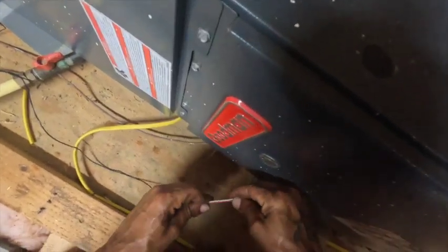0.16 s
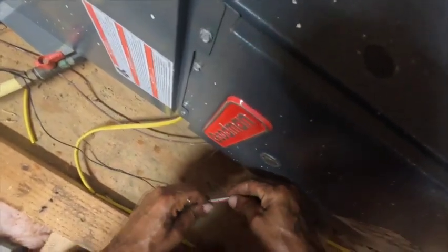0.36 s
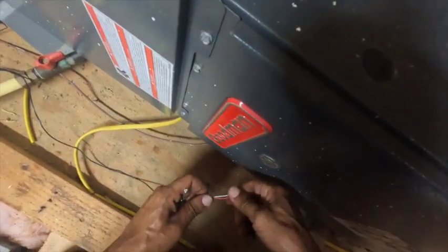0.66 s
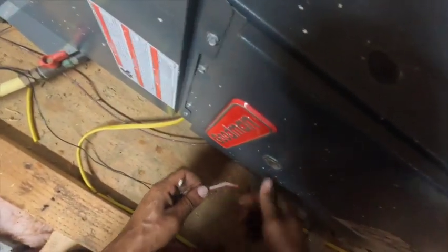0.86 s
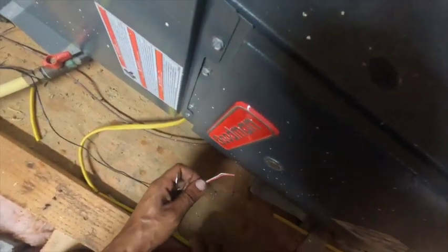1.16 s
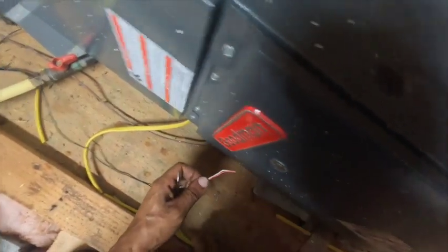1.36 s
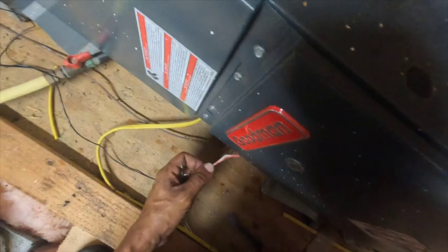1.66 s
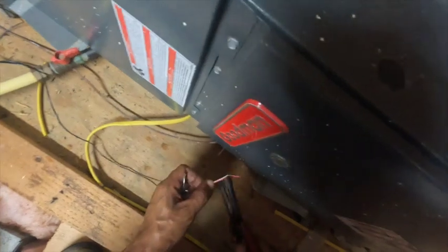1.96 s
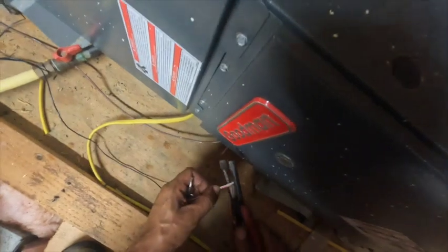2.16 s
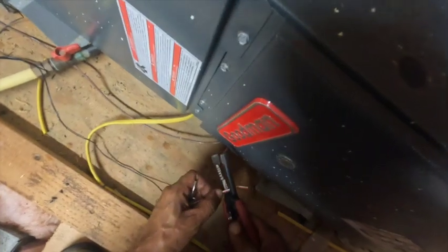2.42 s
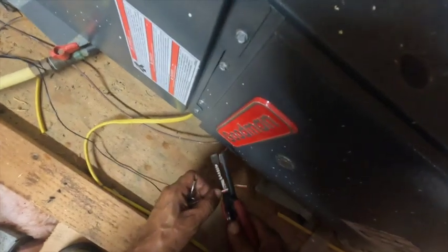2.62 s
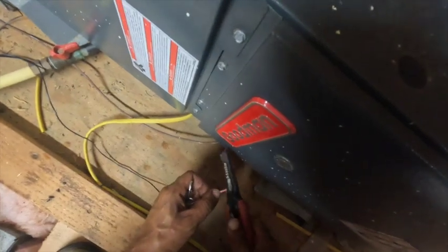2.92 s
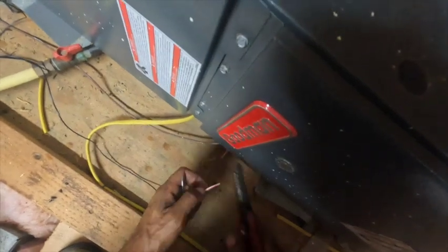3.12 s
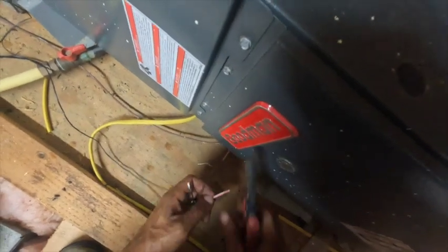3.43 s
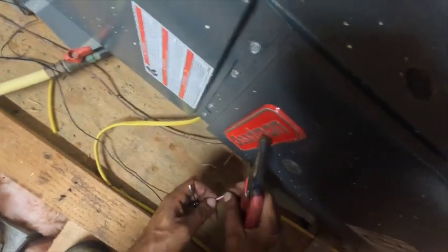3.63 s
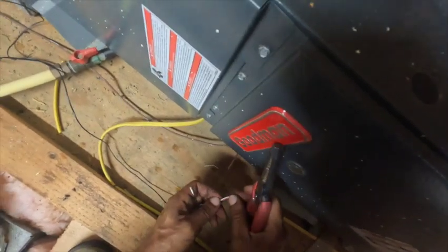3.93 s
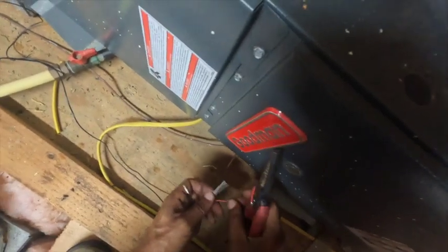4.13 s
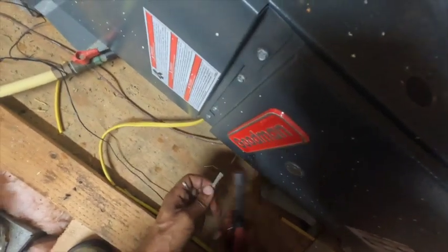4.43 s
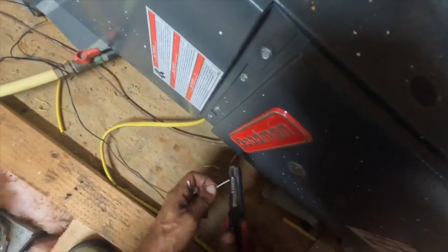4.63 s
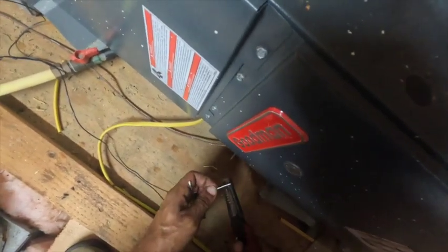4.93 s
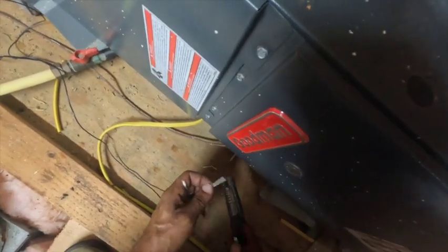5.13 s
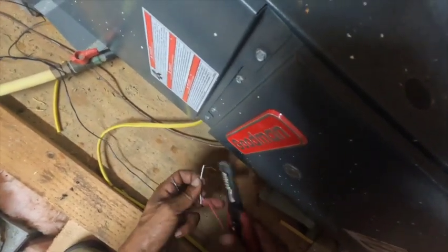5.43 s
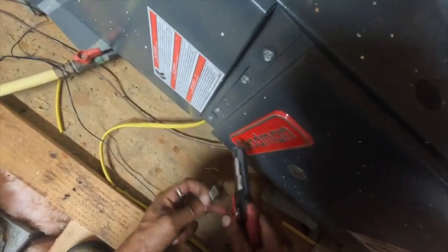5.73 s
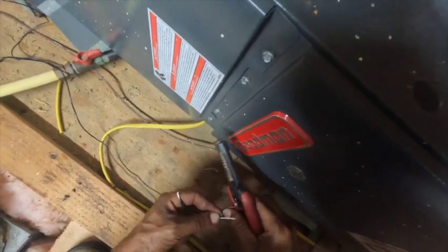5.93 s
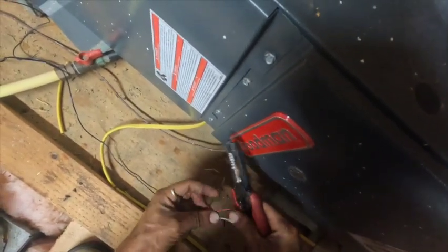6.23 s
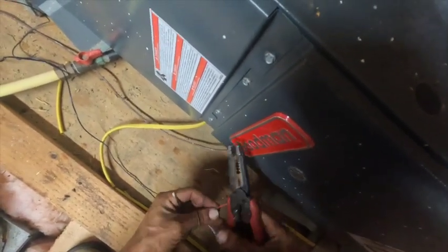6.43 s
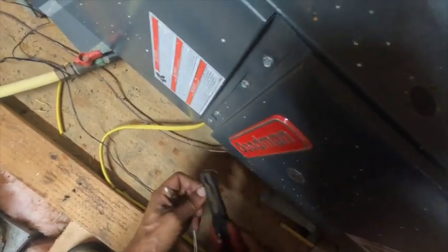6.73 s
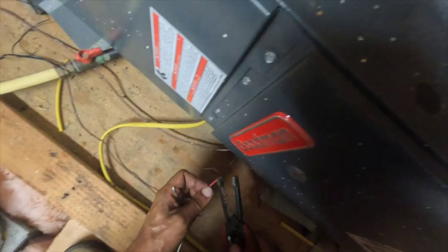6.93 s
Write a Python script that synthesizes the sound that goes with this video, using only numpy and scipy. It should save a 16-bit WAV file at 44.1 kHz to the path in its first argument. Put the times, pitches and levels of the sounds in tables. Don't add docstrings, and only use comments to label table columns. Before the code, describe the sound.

Throughout about 7 seconds, a deep blower rumble swells and sags beneath soft moving air, hollow duct hiss, a very faint mains hum and a thin treble hiss chattering about thirty times a second. Floor boards rustle and thud dully as weight shifts, notably around 1.2, 1.6, 2.95 and near the end. At 1.57 s, wire strippers give a quick cluster of small metallic clicks and a faint scrape. At 2.95 s comes a hard, dry, bright snip with a short jaw ring and fine shimmer, clearly the loudest sound. Lighter clicks and scrapes follow at 3.1-3.3 s. At 3.64 s the tool knocks sheet metal: a low hollow ring, brief rattle and fainter settling touches. Two tiny high squeaks occur around 4.5-4.6 s, a faint tick at 4.8 s, then mostly background. Close body-worn microphone, short wooden-room reflections.

```python
import sys
import numpy as np
from scipy import signal
from scipy.fft import rfft, irfft, next_fast_len
from scipy.io import wavfile
from scipy.ndimage import uniform_filter1d

SR = 44100
rng = np.random.default_rng(int(sys.argv[2]) if len(sys.argv) > 2 else 0)


def magnitude_from_level(level_db):
    exponent = np.asarray(level_db, float) / 20
    return 10 ** exponent


def transcribe(signal):
    frames = np.atleast_2d(signal).T
    limited = np.clip(frames, -1, 1)
    pcm = np.round(limited * 32767).astype(np.int16)
    wavfile.write(sys.argv[1], SR, pcm)


N = 311787
SIZE = next_fast_len(N + 16384)
HZ = np.maximum(np.arange(SIZE // 2 + 1) * SR / SIZE, .1)

# t/s, peak level/dB, main ring f/Hz, dull modes re peak/dB, upper ring re peak/dB
JAW_CLICKS = [(1.5648, -37, 5340, -30, -6), (1.5707, -46, 2840, -15, -17), (1.576, -43, 4700, -7, -8),
              (1.5804, -45, 4870, -24, -8), (2.925, -38, 5030, -28, -19), (2.942, -38, 4660, -33, -24),
              (2.945, -36, 4700, -30, -22), (2.947, -9.5, 4750, -33.5, -17.5),
              (2.9508, -24.5, 4470, -36, -21), (3.126, -31, 5060, -15, -20), (3.203, -41, 3770, -17, -7),
              (3.2066, -44, 4380, -17, -9), (3.2098, -42, 2920, -20, -23), (3.3096, -54, 4970, -5, -18),
              (3.3247, -59, 5470, -12, -14), (4.773, -56, 2950, -6, -17)]
# f/Hz, width/Hz, level/dB
JAW_MODES = [(593, 120, -37), (940, 67, -42), (1277, 120, -28.5), (1705, 55, -24), (2050, 120, -20),
             (2850, 280, -15.5), (3340, 310, -20.5), (3700, 87, -24), (4040, 81, -20), (4750, 240, 3),
             (5540, 260, -16), (5880, 250, -17), (6740, 290, -0.5), (8700, 850, -11.5), (10230, 1500, -15),
             (10900, 1500, -30), (11900, 1800, -26), (13700, 2000, -31)]
# f/Hz, level/dB per Hz
CRACK_SPECTRUM = [(900, -49), (1400, -26), (3000, -5.5), (4800, -1.5), (6800, -1.5), (7900, -18),
                  (10000, -9.5), (12500, -17.5), (15600, -29)]
# t/s, length/ms, fade/ms, level/dB
WIRE_BITES = [(1.568, 15, 16, -55.5), (2.942, 3.9, 2.4, -38), (1.6, 45, 20, -72), (2.948, 5.1, 30.3, -38.5),
              (3.103, 14, 3., -66), (3.117, 4, 3., -60), (3.121, 5.6, 3., -52), (3.128, 8., 27, -52.5),
              (3.204, 7.3, 20, -59), (3.3, 32, 8., -67)]
# f/Hz, level/dB per Hz
RUB_SPECTRUM = [(900, -34), (1300, -17), (1700, -14), (2310, -11), (2900, -12.5), (3480, -7.5),
                (4200, -3.5), (4900, 0), (5600, -8), (6700, -9), (7900, -18.5), (9700, -28), (11500, -36),
                (15500, -46)]
# t/s, length/s, pitch f/Hz, rms level/dB, octave re fundamental/dB
PIVOT_SQUEAKS = [
    (4.506, 0.054, 4960, -70.5, -14),
    (4.58, .05, 5020, -72, -14),
]
# t/s, level/dB, fade/s
BLADE_SHIVERS = [
    (2.952, -61, .04),
    (3.125, -70, .008),
    (3.642, -68, .01),
]
# f/Hz, level/dB per Hz
SHEEN_SPECTRUM = [(7500, -30), (8500, -15), (10000, -4), (12000, -7), (14000, -9), (15600, -28)]

# peak level/dB, rattle length/ms, rattle level/dB, left minus right/dB
KNOCK_LEVELS = (-34, 8.5, -42, 1.5)
# f/Hz, level/dB, t60/s
PANEL_MODES = [(71.3, -5.5, 0.28), (108.6, -13, .25), (152.2, -3, 0.29), (183, -7, .35), (201.2, 1.5, 0.37),
               (228, -13, 0.46), (280, -9, 0.39), (340, -10.5, 0.34), (430, -19, 0.26), (620, -34, 0.22),
               (850, -29, .15), (1040, -11.5, 0.2), (1122, -17, 0.27), (1244, -7.5, 0.43),
               (1500, -22, 0.27), (1754, -18, 0.2), (2330, -22, .15), (2729, -25, .12), (3230, -23, .12)]
# f/Hz, level/dB per Hz
RATTLE_SPECTRUM = [(290, -38), (500, -11), (1090, -2), (1800, -11), (2290, -15), (2860, 1), (3470, -7.5),
                   (5660, -1.5), (6150, -7), (6780, -1), (8240, -23.5), (12200, -32), (14000, -51)]
# f/Hz, level/dB per Hz
SETTLE_SPECTRUM = [(400, -17), (800, -11), (1150, -2.5), (1450, -6.5), (1750, -0.5), (2300, -12),
                   (2850, -8), (3600, -15), (4650, -8), (7000, -28), (8500, -32)]
# t after knock/s, level/dB, fade/s
RETOUCHES = [
    (.042, -10, 0.01),
    (.1, -18, .02),
    (.125, -15, .015),
]

# delay/ms, level/dB
FACE_ECHOES = [
    (3.6, -11.5),
    (10.0, -18.5),
    (16.5, -23.5),
]
# f/Hz, left lead/rad, left minus right/dB
NEAR_PORTS = [(500, 0, -3), (1500, -.7, 1), (2150, -2.2, -.5), (2800, -2.2, -1), (3400, -.7, -1.5),
              (4300, -.2, -2), (9000, -.3, -.5), (13000, -1.2, -4)]
# f/Hz, share
WASH_SPREAD = [(500, 1.1), (2200, 4.6), (3500, 4.5), (4500, 0.43), (9000, 0.2), (13000, 0.45)]
# f/Hz, left minus right/dB, likeness 0-1, left lead/rad
DIFFUSE_PORTS = [(20, -4.5, .995, 0), (100, -3, .9, 0), (200, -4.5, .7, .2), (400, -6, .3, 0),
                 (800, -5.5, .15, -.4), (1250, 0, .55, -.5), (1750, 2.5, .8, -.6), (2200, 2.5, .5, -1.),
                 (2800, 3, .75, -1.1), (3900, 0, .55, -.8), (4500, -.8, .95, 0), (7200, -.5, .96, 0),
                 (8500, -.3, .78, .1), (14000, .5, .7, .1)]

# f/Hz, level/dB per Hz
RUMBLE_SPECTRUM = [(1, -24.5), (5, -2.5), (13, -1), (18, -3), (28, -11.5), (35, -15.5), (45, -26.5),
                   (50, -34), (60, -45), (80, -72)]
# t/s, sub-bass level/dB
BLOWER_LOAD = [(0.0, -33), (0.025, -20), (0.1, -24), (0.7, -26.5), (1.3, -28.5), (1.9, -25), (2.9, -31.5),
               (2.96, -21), (3.3, -30.5), (3.9, -34.5), (3.97, -23.5), (4.12, -30), (4.3, -32),
               (4.8, -27.5), (5.2, -26.5), (5.7, -30.5), (6.2, -29), (7.07, -30.5)]
# f/Hz, level/dB per Hz
AIR_SPECTRUM = [(40, -40), (62, -13), (105, -6.5), (175, 0), (250, -8), (330, -9), (460, -15.5),
                (800, -23.5), (1100, -48)]
# f/Hz, level/dB per Hz
DUCT_SPECTRUM = [(410, -18.5), (700, -15), (823, -16.5), (945, -8), (1020, -5.5), (1130, -5.5), (1310, -2),
                 (1430, -6.5), (1730, 1), (2320, -9), (2750, -5), (3140, -10.5), (4110, -12), (4400, -8),
                 (5720, -58), (9680, -120)]
# f/Hz, level/dB per Hz
BOARD_SPECTRUM = [(40, -45), (62, 1), (75, 2.5), (105, -1), (175, -2.5), (230, -7), (330, -22), (500, -26),
                  (900, -29)]
# t/s, peak level/dB
WEIGHT_SHIFTS = [(0.09, -42), (0.249, -51), (0.44, -47), (2.41, -48), (5.12, -49), (4.39, -55), (6.6, -52),
                 (6.7, -46), (1.049, -47), (1.22, -39.5), (1.413, -45), (1.563, -40), (1.886, -50),
                 (2.089, -66), (2.6, -51), (2.95, -37.5), (3.974, -44.5), (3.84, -50), (4.85, -49),
                 (5.389, -55), (6.42, -59), (4.58, -45), (5.229, -57), (6.199, -70), (6.814, -41),
                 (7.039, -37)]
# f/Hz, level/dB per Hz
CIRCUIT_SPECTRUM = [(3300, -13), (4000, -12.5), (4960, 2.5), (5590, -1), (5960, 1.5), (6320, -5),
                    (6640, -3), (6860, -4.5), (7200, -9), (8190, -14.5), (9520, -14.5), (11000, -15.5),
                    (11500, -23.5), (13400, -26), (14100, -46)]
# start t/ms, length/ms
TASK_TIMES = [(.3, 1.2), (.3, 7.6), (7.8, .8), (19.8, 5.2), (25., 8.6)]
# low treble level/dB, high treble level/dB
TASK_LEVELS = [(-11, 3), (-3.5, 4), (4.5, 13.5), (3, 5.5), (-8, 0)]


def along(table, column=1):
    table = np.array(table, float)
    return np.interp(np.log(HZ), np.log(table[:, 0]), table[:, column])


def shape(spectrum):
    inside = (HZ > spectrum[0][0]) * (HZ < spectrum[-1][0])
    return magnitude_from_level(along(spectrum)) * inside


def curve(rows):
    rows = np.array(rows, float)
    return magnitude_from_level(np.interp(np.arange(N) / SR, rows[:, 0], rows[:, 1]))


def unit(x):
    return x / np.sqrt(np.mean(x ** 2))


def coloured(spectrum):
    white = rfft(rng.standard_normal(SIZE))
    return unit(irfft(white * shape(spectrum), SIZE)[:N])


def walk(rate_hz):
    knots = rng.standard_normal(N // 100)
    joined = np.interp(np.arange(N) / SR * rate_hz, np.arange(len(knots)), knots)
    return unit(uniform_filter1d(joined, int(SR / rate_hz / 2)))


def diffuse(spectrum):
    one, other = rfft(rng.standard_normal((2, SIZE))) * shape(spectrum)
    like = np.clip(along(DIFFUSE_PORTS, column=2), 0, 1)
    tilt_db = along(DIFFUSE_PORTS) / 2
    left = one * magnitude_from_level(tilt_db) * np.exp(1j * along(DIFFUSE_PORTS, column=3))
    right = (like * one + np.sqrt(1 - like ** 2) * other) * magnitude_from_level(-tilt_db)
    pair = irfft(np.array([left, right]), SIZE)[:, :N]
    return pair / np.sqrt(np.mean(pair.mean(axis=0) ** 2))


def add(out, sound, s, pan_db):
    i = int(s * SR)
    sound = sound[:N - i]
    out[:, i:i + len(sound)] += sound * magnitude_from_level(np.array([[pan_db], [-pan_db]]) / 2)


def jaw_clicks():
    free_ms, choke_ms, dull_choke_ms = 2.2, 0.81, 8.9
    rise_s, bright_per_db = 0.00061, 3
    crack_db, crack_per_db = -7, 0.1
    out, t = np.zeros((2, N)), np.arange(SR // 5) / SR
    hz, width_hz, mode_db = np.array(JAW_MODES, float).T[:, :, None]
    dull, main, upper = hz < 3500, mode_db == mode_db.max(), (hz > 6200) & (hz < 7400)
    dull_share = dull * np.where(hz < 2500, 0.73, 1)
    choke = np.exp(-np.maximum(t - free_ms / 1000, 0) / np.where(dull, dull_choke_ms, choke_ms) * 1000)
    decay = choke * np.exp(-.6 * width_hz * t)
    rise = (1 - np.exp(-t / rise_s)) ** 2
    crack_shape = np.minimum(t / .0003, 1) * np.exp(-t / .002)
    grit = coloured(CRACK_SPECTRUM)
    chance = rng.standard_normal((len(JAW_CLICKS), 2, len(JAW_MODES), 1))
    for (s, peak_db, main_hz, dull_db, upper_db), (size, pitch) in zip(JAW_CLICKS, chance):
        gain_db = mode_db + 2.5 * size * ~main
        gain_db = gain_db + dull_share * (dull_db + 25) + upper * (upper_db + 14)
        gain_db = gain_db + (hz > 7500) * bright_per_db * (peak_db + 10)
        ring_hz = np.where(main, main_hz, hz * (1 + .01 * pitch))
        ring = np.sum(magnitude_from_level(gain_db) * decay * np.sin(2 * np.pi * ring_hz * t), axis=0) * rise
        crack = magnitude_from_level(crack_db + crack_per_db * peak_db) * grit[int(s * SR):][:len(t)] * crack_shape
        add(out, magnitude_from_level(peak_db) * (ring / np.abs(ring).max() + crack), s, pan_db=2)
    return out


def wire_bites():
    out, t = np.zeros((2, N)), np.arange(SR // 5) / SR
    rub = coloured(RUB_SPECTRUM) * magnitude_from_level(2.5 * walk(400))
    for s, length_ms, fade_ms, db in WIRE_BITES:
        fade = np.exp(-np.maximum(t - length_ms / 1000, 0) / fade_ms * 1000)
        grip = np.minimum(t / .001, 1) * fade
        add(out, magnitude_from_level(db) * grip * rub[int(s * SR):][:len(t)], s, pan_db=-1.0)
    return out


def pivot_squeaks():
    out, t = np.zeros((2, N)), np.arange(SR // 4) / SR
    waver = walk(48)
    for s, length_s, hz, db, octave_db in PIVOT_SQUEAKS:
        drift = waver[int(s * SR):][:len(t)]
        phase = 2 * np.pi * np.cumsum(hz * (1 + .004 * drift)) / SR
        swell = np.sin(np.pi * np.minimum(t / length_s, 1)) ** .5 * magnitude_from_level(db + 6.5 + 2.0 * drift)
        add(out, swell * (np.sin(phase) + magnitude_from_level(octave_db) * np.sin(2 * phase)), s, pan_db=1.0)
    return out


def blade_shivers():
    out, t = np.zeros((2, N)), np.arange(SR // 4) / SR
    sheen = coloured(SHEEN_SPECTRUM)
    for s, db, fade_s in BLADE_SHIVERS:
        swell = magnitude_from_level(db) * np.minimum(t / .002, 1) * np.exp(-t / fade_s)
        add(out, swell * sheen[int(s * SR):][:len(t)], s, pan_db=-1.0)
    return out


def panel_ring(t):
    held_s, damp_s, buzz_hz = 0.072, .03, 201
    hz, db, t60_s = np.array(PANEL_MODES, float).T[:, :, None]
    upper = hz > 500
    modes = np.exp(-np.log(1000) * t / t60_s) * np.sin(2 * np.pi * hz * t + hz)
    modes = modes * np.exp(-np.maximum(t - held_s, 0) / damp_s * upper)
    shove_s = np.where(hz < 500, .012, .002)
    flutter = uniform_filter1d(rng.standard_normal(modes.shape), size=600, axis=1)
    rung = modes * (1 - np.exp(-t / shove_s)) ** 2 * magnitude_from_level(60 * flutter)
    rung = rung / np.abs(rung).max(axis=1, keepdims=True)
    buzz = 1 + .8 * np.sin(2 * np.pi * buzz_hz * t) * upper
    ring = np.sum(buzz * magnitude_from_level(db) * rung, axis=0)
    return ring / np.abs(ring).max()


def cabinet():
    knock_s, rattle_fade_s, tail_fade_s, tail_db = 3.6415, 0.012, 0.032, -3
    peak_db, rattle_ms, rattle_db, pan_db = KNOCK_LEVELS
    out, t = np.zeros((2, N)), np.arange(SR // 2) / SR
    loose_s = np.maximum(t - rattle_ms / 1000, 0)
    chatter = (coloured(RATTLE_SPECTRUM) * magnitude_from_level(1.5 * walk(300)))[:len(t)]
    bright = np.minimum(t / 0.0037, 1) * np.exp(-loose_s / rattle_fade_s) * chatter
    again = 0
    for s, db, fade_s in RETOUCHES:
        again = again + magnitude_from_level(db) * np.clip((t - s) / .003, 0, 1) * np.exp(-(t - s) / fade_s)
    tail = np.exp(-loose_s / tail_fade_s) + again
    dull = np.minimum(t / 0.0011, 1) * tail * coloured(SETTLE_SPECTRUM)[:len(t)]
    rattle = magnitude_from_level(rattle_db) * (bright + magnitude_from_level(tail_db) * dull)
    add(out, magnitude_from_level(peak_db) * panel_ring(t) + rattle, knock_s, pan_db)
    return out


def loft(near):
    t60_s, wash_db, bend_hz = .2, -17, 900
    t = np.arange(12000) / SR
    wash = rng.standard_normal((2, len(t))) * np.exp(-np.log(1000) * t / t60_s)
    wash = wash * np.minimum(t / 0.00092, 1)
    same, other = rfft(magnitude_from_level(wash_db) * wash / np.sqrt(np.sum(wash[0] ** 2)), SIZE)
    wash = same + np.array([[1], [-1]]) * along(WASH_SPREAD) * other
    narrow = HZ ** 2 / (HZ ** 2 + bend_hz ** 2)
    echoes = sum(magnitude_from_level(db) * np.exp(-2j * np.pi * HZ * ms / 1000) for ms, db in FACE_ECHOES)
    half = np.array([[.5], [-.5]])
    lead = np.exp(1j * along(NEAR_PORTS) * half) * magnitude_from_level(along(NEAR_PORTS, column=2) * half)
    return irfft(rfft(near, SIZE) * lead * (1 + narrow * (echoes + wash)), SIZE)[:, :N]


def boards():
    attack_s, fade_s, shift_db, rustle_db = 0.0038, 0.043, -12, -65
    s, db = np.array(WEIGHT_SHIFTS).T[:, :, None]
    since_s = np.maximum(np.arange(N) / SR - s, 0)
    bumps = magnitude_from_level(db + shift_db) * (1 - np.exp(-since_s / attack_s)) * np.exp(-since_s / fade_s)
    weight = magnitude_from_level(rustle_db) + bumps.sum(axis=0)
    return diffuse(BOARD_SPECTRUM) * weight * magnitude_from_level(1.5 * walk(30) - 1.0)


def air_handler():
    air_db, duct_db = -65.5, -67.5
    rumble = diffuse(RUMBLE_SPECTRUM)
    power = uniform_filter1d(rumble.mean(axis=0) ** 2, size=9000)
    swell = rumble / np.sqrt(power + 0.39) * curve(BLOWER_LOAD)
    air = diffuse(AIR_SPECTRUM) * magnitude_from_level(air_db + 1.2 * walk(7.2))
    duct = diffuse(DUCT_SPECTRUM) * magnitude_from_level(duct_db + .6 * walk(1.5) + .8 * walk(12))
    return swell + air + duct


def mains_hum():
    hum_hz, hum_db = 121.7, -72.5
    tone = np.sin(2 * np.pi * hum_hz * np.arange(N) / SR)
    return magnitude_from_level(hum_db + 1.1 * walk(0.57)) * tone * magnitude_from_level(np.array([[-1.5], [1.5]]))


def circuits():
    frame_hz, split_hz, circuit_db = 30 / 1.001, 7600, -66
    odd_frame_db, scatter_db = (0.2, -1), (1, 0)
    cycle = np.arange(N) / SR * frame_hz
    frame, ms = cycle.astype(int), cycle % 1 * 1000 / frame_hz
    chance = rng.standard_normal((frame[-1] + 1, len(TASK_TIMES)))[frame].T
    odd = (-1.) ** frame
    busy = [(ms >= start) * (ms < start + length) for start, length in TASK_TIMES]
    hiss = rfft(diffuse(CIRCUIT_SPECTRUM), SIZE)
    bands = (HZ < split_hz, HZ >= split_hz)
    out = 0
    for band, task_db, odd_db, luck_db in zip(bands, np.transpose(TASK_LEVELS), odd_frame_db, scatter_db):
        power = 1
        for db, on, luck in zip(task_db, busy, chance):
            power = power + magnitude_from_level(db + odd_db * odd + luck_db * luck) ** 2 * on
        load = unit(uniform_filter1d(np.sqrt(power), size=12))
        out = out + irfft(hiss * band, SIZE)[:, :N] * load
    return out * magnitude_from_level(circuit_db + .5 * walk(1.84))


def scene():
    near = jaw_clicks() + wire_bites() + pivot_squeaks() + blade_shivers() + cabinet()
    steady = air_handler() + boards() + mains_hum() + circuits()
    return loft(near) + steady


def roll_off(x):
    return signal.sosfilt(signal.butter(12, 15610, fs=SR, output="sos"), x)


def record(dry):
    return roll_off(dry)


dry = scene()
out = record(dry)
transcribe(out)
```